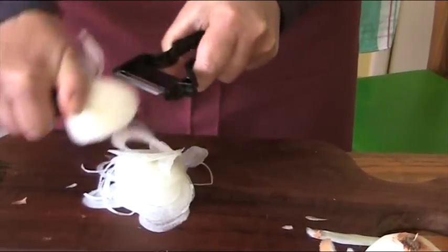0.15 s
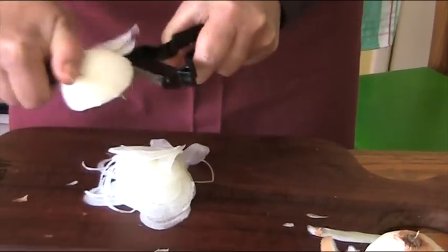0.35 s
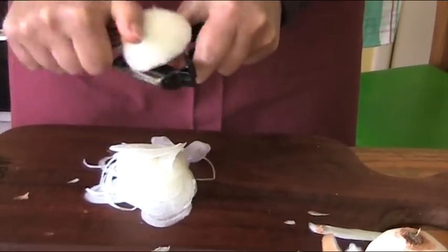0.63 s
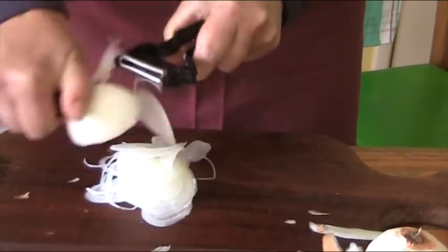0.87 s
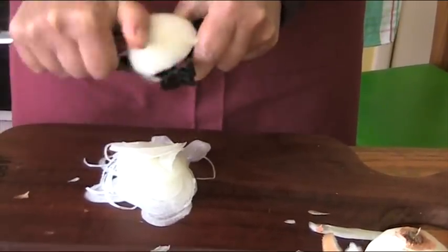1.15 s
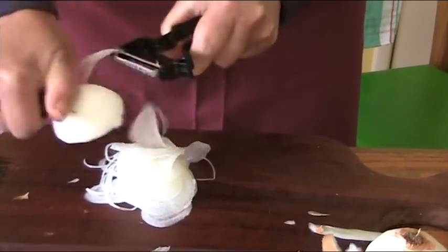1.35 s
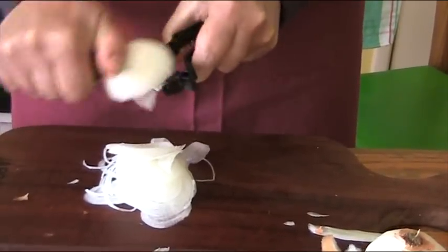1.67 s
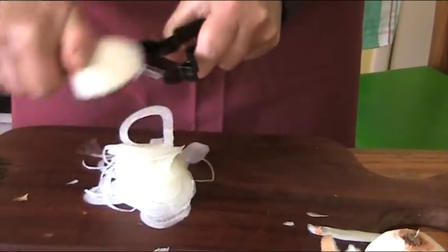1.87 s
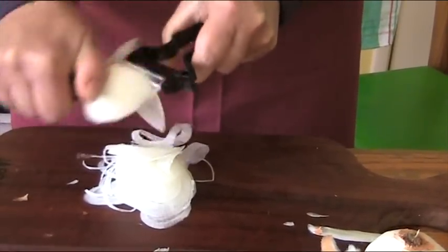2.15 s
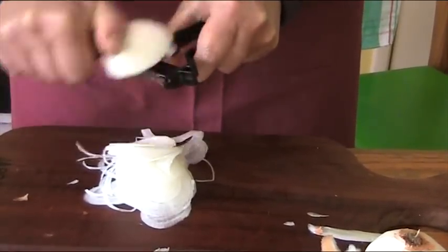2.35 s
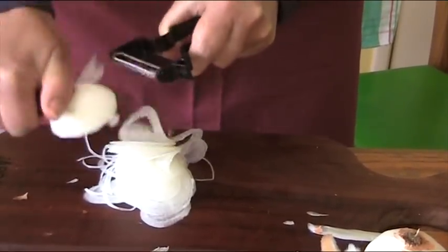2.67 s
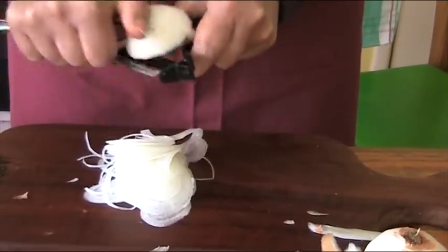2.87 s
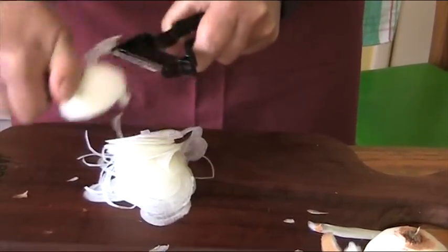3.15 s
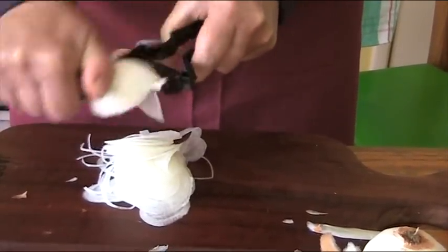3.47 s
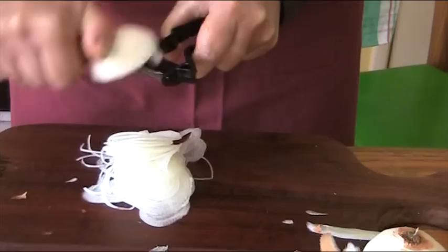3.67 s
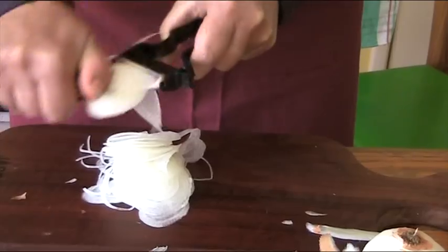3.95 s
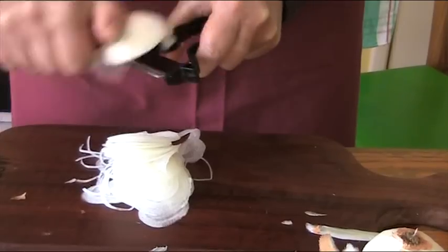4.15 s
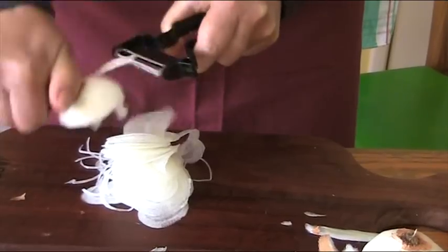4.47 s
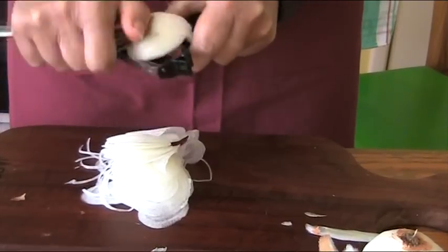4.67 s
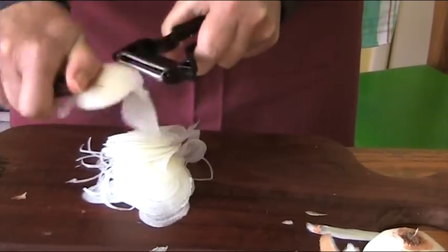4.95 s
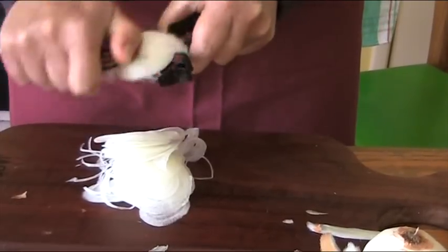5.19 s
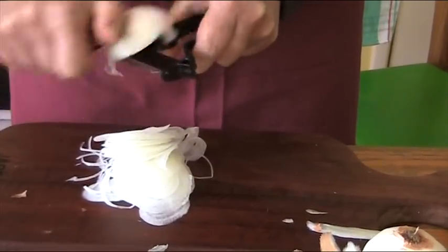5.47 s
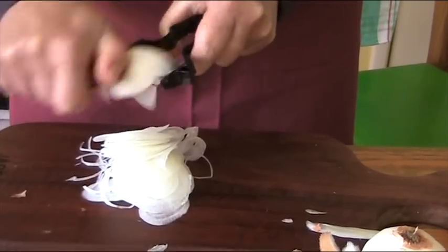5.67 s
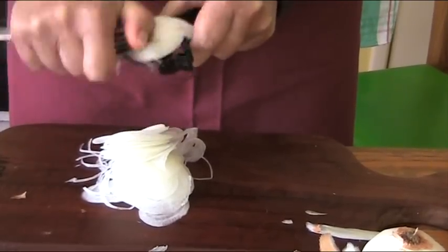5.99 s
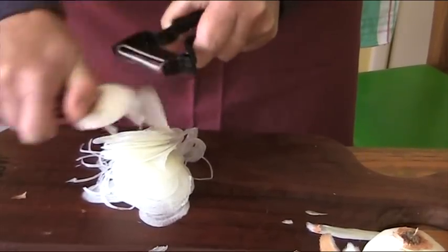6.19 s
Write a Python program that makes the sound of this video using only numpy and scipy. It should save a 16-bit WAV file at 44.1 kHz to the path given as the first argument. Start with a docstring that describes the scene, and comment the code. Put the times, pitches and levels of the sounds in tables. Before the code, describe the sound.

Half an onion is drawn over a hand-held steel peeler about twice a second, close to the microphone in a kitchen. Most strokes start with a light clack of the swivelling blade, run into a crisp, wet rasp and end in a small crunch and snap as the slice comes free. Now and then the loose blade gives a thin, high ring. The hard room echoes briefly over a low background noise.

```python
"""Half an onion is drawn again and again over a hand-held steel peeler, close by in a kitchen.
The swivelling blade clacks as the onion meets it, then bursts a dense stream of cells as it cuts.
At the end of the stroke the slice crunches, snaps free and slides off. Now and then the free blade
swings against its stop and sings. A dull rustle swells twice under the later strokes.
Throughout, the hard room rings on over a low background."""
import sys
import numpy as np
from scipy import signal
from scipy.fft import rfft, irfft, next_fast_len
from scipy.io import wavfile

SR = 44100
rng = np.random.default_rng(int(sys.argv[2]) if len(sys.argv) > 2 else 0)


def wav_out(sig):
    """Save sig, one row per channel (or a flat mono array), as 16-bit PCM at SR to the path in sys.argv[1]."""
    wavfile.write(sys.argv[1], SR, np.round(np.clip(np.atleast_2d(sig).T, -1, 1) * 32767).astype(np.int16))


N = 279153
TIME = np.arange(N) / SR
FFT_SIZE, BLOW_SIZE = 2 * next_fast_len(N // 2 + 1), 1024
FOLLOW_THROUGH_S = 0.015  # contact outlasts the snap

# Cuts. Each row: bite in seconds, snap in seconds, then relative levels in dB: final rasp, swell over
# the stroke, mid-stroke arch, fizz re rasp, final crunch re rasp, snap peak, snap treble.
STROKES = [(-0.08, 0.06, -34.5, -2, 1, -8, -6.5, -17, -15), (0.708, 0.875, -32.5, 6, 1.5, -8, -2, -14, -22),
           (1.17, 1.324, -34.5, 6, 3, -6, -6, -25, -26), (1.628, 1.758, -33.5, 5.5, 2, -5, -4, -16.5, -17),
           (2.039, 2.189, -33.5, 2.5, -0.5, -4, -3, -20.5, -9),
           (2.47, 2.625, -32, 5, 0, -6.5, -9, -10.5, -9), (2.932, 3.078, -33.5, 4.5, 0, -7, -11, -17, -12),
           (3.371, 3.524, -33.5, 6, 1, -6, -5.5, -16.5, -25),
           (3.833, 3.996, -35.5, 5, 3, -6, -3.5, -11, -6.5),
           (4.286, 4.41, -32.5, 5.5, 0, -8.5, -8, -21, -18),
           (4.703, 4.921, -40, 2.5, 5, -6.5, -12, -21, -8),
           (5.177, 5.304, -31.5, 9.5, 1.5, -8.5, -8, -14, -11),
           (5.6, 5.74, -34.5, 7, 4.5, -8.5, -6, -11.5, -13),
           (6.085, 6.195, -36.5, 2, 3.5, -7, -11, -14.5, -7)]


def undb(db):
    """Decibels to gain."""
    return 10 ** (np.asarray(db) / 20)


def unit(x):
    """Scale to rms 1."""
    return x / np.sqrt(np.mean(x ** 2))


def read(points, hz):
    """Interpolate a table on a log-frequency axis."""
    f, value = np.transpose(points)
    return np.interp(np.log(np.maximum(hz, 1)), np.log(f), value)


def bins(size):
    """Frequencies of a real spectrum in Hz."""
    return np.fft.rfftfreq(size, 1 / SR)


def colour(x, points):
    """Filter by a curve of (Hz, dB) points."""
    gain = undb(read(points, bins(FFT_SIZE)))
    return irfft(rfft(x, FFT_SIZE) * gain)[..., :x.shape[-1]]


def response(db):
    """Minimum-phase impulse response from a gain per bin."""
    cepstrum = irfft(np.log(undb(db)))
    half = len(cepstrum) // 2
    cepstrum[1:half] *= 2
    cepstrum[half + 1:] = 0
    return irfft(np.exp(rfft(cepstrum)))


def convolve(x, impulse):
    """Convolve, keeping the length of x."""
    return signal.fftconvolve(x, impulse)[:len(x)]


def unit_band(x, lo_hz, hi_hz):
    """Scale so that one band has rms 1."""
    f = bins(len(x))
    band = rfft(x)[(f > lo_hz) & (f < hi_hz)]
    return x * len(x) / np.sqrt(2 * np.sum(np.abs(band) ** 2))


def walk(rate_hz):
    """Random wander with a spread near 1."""
    knots = rng.standard_normal(4096)
    return np.interp(TIME * rate_hz, np.arange(len(knots)), knots)


def add(track, start_s, sound):
    """Mix a sound into a track."""
    i = max(int(start_s * SR), 0)
    track[i:i + len(sound)] += sound[:max(N - i, 0)]


def slicing():
    """The edge scrapes in and bursts cells; the bulb answers with a hollow crunch as the cut deepens."""
    # Spectra of the cut's four layers. Each row: frequency in Hz, relative level in dB.
    rasp_curve = [(150, -36), (450, -19.5), (700, -5.5), (1050, -8.5), (1600, -5.5), (2200, -2.5),
                  (3000, -1), (4500, -3), (5600, -0.5), (7000, -2.5), (8500, -3.5), (10000, -10),
                  (16000, -39)]
    crunch_curve = [(100, -18.5), (280, -13), (480, -8), (650, 1.5), (820, 0.5), (980, -5.5), (1300, -2),
                    (1800, -0.5), (3000, -15.5), (16000, -58)]
    fizz_curve = [(1000, -37), (7000, 1), (9000, -3.5), (10200, -6.5), (11500, -2.5), (13500, -3),
                  (14600, -2.5), (16000, -21)]
    scrape_curve = [(500, -24), (1400, -21), (1750, -3.5), (2200, -5), (2500, -10), (3200, -36),
                    (16000, -39)]
    bite_s, release_s = 0.0082, 0.014
    crunch_lead_s, crunch_width_s = 0.0021, 0.011
    rasp = peeler(ruptures(rasp_curve, per_s=12000, spread_db=1.5), ring_db=3.5)
    rasp = unit_band(rasp, lo_hz=1800, hi_hz=8000)
    crunch = peeler(ruptures(crunch_curve, per_s=1800, spread_db=2), ring_db=2)
    crunch = unit_band(crunch, lo_hz=350, hi_hz=1400)
    fizz = peeler(ruptures(fizz_curve, per_s=7000, spread_db=3.5), ring_db=-13)
    fizz = unit_band(fizz, lo_hz=9000, hi_hz=16000)
    scrape = unit(peeler(ruptures(scrape_curve, per_s=2800, spread_db=2.5), ring_db=7))
    out = np.zeros(N)
    for start_s, snap_s, rasp_db, swell_db, arch_db, fizz_db, crunch_db, *_ in STROKES:
        end_s = snap_s + FOLLOW_THROUGH_S
        span = (TIME > start_s) & (TIME < end_s)
        t = TIME[span]
        contact = np.clip((t - start_s) / bite_s, 0, 1) * np.clip((end_s - t) / release_s, 0, 1)
        progress = (t - start_s) / (end_s - start_s)
        effort_db = rasp_db - swell_db * (1 - progress) + arch_db * np.sin(np.pi * progress)
        giving_way = np.exp(-((t - snap_s + crunch_lead_s) / crunch_width_s) ** 2)
        hollow = undb(-20 + 5.5 * progress) + undb(crunch_db) * giving_way
        cut = rasp[span] + hollow * crunch[span]
        cut += undb(fizz_db + 3 * (1 - progress)) * fizz[span]  # juiciest on first contact
        cut += undb(-3 - 29 * progress) * scrape[span]  # the onion damps the frame's main note
        out[span] += contact * undb(effort_db) * cut
    out = wet_contact(out, depth_db=1.9, rate_hz=20)
    # The edge catches and slips on the bulb's layers.
    return out * undb(-3 + 0.5 * walk(rate_hz=480) + 0.093 * walk(rate_hz=37))


def ruptures(curve, per_s, spread_db):
    """Random clicks, as of bursting cells, most faint and a few loud, filtered by a curve."""
    bursts = rng.random(N) < per_s / SR
    strength = undb(spread_db * np.minimum(rng.exponential(size=N), 5))
    polarity = np.sign(rng.standard_normal(N))
    return colour(unit(bursts * strength * polarity), curve)


def wet_contact(x, depth_db, rate_hz):
    """Bands swell and sink independently as the wet contact patch changes shape."""
    centres_hz = np.geomspace(1000, 15000, 9)
    spectrum, f = rfft(x, FFT_SIZE), bins(FFT_SIZE)
    out = np.zeros(N)
    for share in np.eye(len(centres_hz)):
        band = irfft(spectrum * np.interp(f, centres_hz, share))[:N]
        out += band * undb(depth_db * walk(rate_hz))
    return out


def peeler(x, ring_db):
    """Blade and frame add their resonances to whatever shakes them."""
    # Each row: resonance in Hz, width in Hz, relative gain in dB.
    modes = [(1238, 170, -7), (2246, 100, -3), (2788, 130, -2), (3444, 160, -5.5), (3960, 210, -11),
             (5130, 120, -4), (5740, 120, -4.5), (6220, 68, -8), (6820, 50, 2.5), (7130, 60, -4),
             (8260, 40, -4), (11180, 350, 1.5), (13100, 230, -14)]
    ringing = sum(undb(db) * signal.lfilter(*signal.iirpeak(hz, hz / width_hz, SR), x)
                  for hz, width_hz, db in modes)
    return x + undb(ring_db) * ringing


def break_out():
    """The last bridge of onion gives way with a short, falling crunch."""
    # Crunch bands. Each row: centre in Hz, start before the snap in seconds, level in dB.
    bands = [(2480, 0.03, -39.5), (1710, 0.019, -46), (770, 0.011, -49.5), (427, 0.012, -52)]
    out = np.zeros(N)
    for hz, lead_s, db in bands:
        curve = [(hz / 2, -22), (hz, 0), (hz * 2, -22), (hz * 10, -60)]
        band = unit(ruptures(curve, per_s=2800, spread_db=3.5))
        gate = np.zeros(N)
        for _, snap_s, *_ in STROKES:
            add(gate, snap_s - lead_s, np.hanning(int(0.028 * SR)))
        out += undb(db) * band * gate
    return out


def slice_ends():
    """Each slice snaps free and two last fibres part; loose slices flick off and drop on the pile."""
    # Each row: start in seconds, relative peak in dB, relative treble in dB, chatter in seconds.
    flicks = [(0.081, -18, -8, .002), (0.400, -31, -19, .004), (0.423, -34, -15, 0.0037),
              (1.364, -29, -16, 0.0026), (1.486, -36, -16, 0.0044), (2.216, -21, -10, 0.0018),
              (3.100, -24, -6, 0.0018), (3.120, -23, -9, .002), (3.684, -39, -20, .003),
              (4.578, -30.5, -23, 0.0094), (4.630, -34, -21, .008), (4.655, -38, -16, 0.0074),
              (4.974, -27, 0, 0.0034), (5.088, -41, -15, 0.0027), (5.327, -20, -9, .003),
              (5.778, -24, -15, .002), (6.222, -21, -7, 0.0022)]
    fibre_db, fibre_fade_db_per_s = -24, 120
    snaps, out = list(flicks), np.zeros(N)
    for _, snap_s, *_, snap_db, treble_db in STROKES:
        snaps.append((snap_s, snap_db, treble_db, 0.0022))
        for late_s in rng.uniform(0.015, 0.043, 2):
            snaps.append((snap_s + late_s, fibre_db - fibre_fade_db_per_s * late_s, -13, 0.002))
    for start_s, peak_db, treble_db, chatter_s in snaps:
        snap = blow(peak_db, knock_db=-26, treble_db=treble_db,
                    chatter_s=chatter_s, rise_s=0.81 * chatter_s, fade_s=0.011)
        add(out, start_s, snap)
    return undb(-5.5) * peeler(out, ring_db=-2)


def slither():
    """After each cut the wet slice slides off the steel with a fading crackle."""
    # Crackle spectrum. Each row: frequency in Hz, relative level in dB.
    curve = [(300, -18), (1500, 8), (3000, 12), (7000, 3), (11500, -1), (16000, -26)]
    crackle = unit(peeler(ruptures(curve, per_s=1400, spread_db=0), ring_db=-3))
    t, slides = TIME[:SR // 4], np.zeros(N)
    fade = undb(-37.5) * np.exp(-t / 0.0046) + undb(-55) * np.exp(-t / 0.23)
    for _, snap_s, *_ in STROKES:
        add(slides, snap_s + FOLLOW_THROUGH_S, fade)
    return crackle * slides


def blade_clacks():
    """The loose blade chatters against its stop, pressed by the onion or swinging free."""
    # Free swings. Each row: start in seconds, relative peak, low knock and treble in dB,
    # note in Hz, chatter in seconds, rise in seconds.
    swings = [(0.187, -12.5, -22.5, -17, 5340, .002, 0.0012), (0.194, -9.5, -22, -6, 5800, 0.0045, 0.0049),
              (0.370, -18.5, -27, -14, 8340, 0.0039, 0.002), (1.051, -15, -27, -4, 3330, 0.0062, 0.0017),
              (2.362, -14.5, -37, -4.5, 2940, 0.0021, 0.0022),
              (5.881, -17.5, -20, -17.5, 4960, 0.005, 0.0019)]
    # The onion lands on the blade. Each row: start in seconds, relative peak and treble in dB,
    # note in Hz, rebound in dB re the first knock.
    landings = [(0.664, -31.5, -17, 2840, -16), (0.695, -30.5, -14, 2100, -15),
                (1.147, -26.5, -15, 5730, -20), (1.601, -29.5, -16, 5600, -15),
                (1.629, -23, -20, 5780, -10), (2.031, -14, -7, 2200, -7), (2.467, -20, -7, 2200, 1),
                (2.916, -14, -8, 2160, -1), (3.359, -22.5, -19, 2830, -12), (3.823, -26, -18, 2250, 5),
                (4.269, -24, -12, 2200, 2), (4.691, -26.5, -15, 2200, 2), (5.16, -20.5, -8, 2380, -9),
                (5.576, -33, -10, 5770, 0.5), (5.599, -27.5, -8, 5700, -12), (6.008, -28.5, -23, 2220, -8),
                (6.028, -28, -14.5, 2230, -5)]
    cushioned_db, landing_chatter_s, landing_rise_s, rebound_s = -29.5, 0.0043, 0.0027, 0.0081
    clacks, out = list(swings), np.zeros(N)
    for start_s, peak_db, treble_db, hz, rebound_db in landings:
        for at_s, db in (start_s, peak_db), (start_s + rebound_s, peak_db + rebound_db):
            clacks.append((at_s, db, cushioned_db, treble_db, hz, landing_chatter_s, landing_rise_s))
    for start_s, peak_db, knock_db, treble_db, hz, chatter_s, rise_s in clacks:
        # The strike point decides which damped note stands out.
        note_db = 7 / (1 + ((bins(BLOW_SIZE) - hz) / 350) ** 2)
        clack = blow(peak_db, knock_db, treble_db, chatter_s, rise_s, fade_s=0.0057, note_db=note_db)
        soft_onset = blow(peak_db - 18.5, knock_db, treble_db - 10, chatter_s, rise_s, fade_s=0.005)
        add(out, start_s, clack)
        add(out, start_s - 0.003, soft_onset)  # a faint, duller lead-in softens the attack
    return undb(-4.5) * peeler(out, ring_db=-1.5)


def blow(peak_db, knock_db, treble_db, chatter_s, rise_s, fade_s, note_db=0):
    """A cushioned contact and a few milliseconds of chatter, each blow with its own colour."""
    # Clack spectrum. Each row: frequency in Hz, relative level in dB.
    curve = [(100, -52), (450, -18), (750, 4.5), (1500, 0), (2800, -0.5), (4200, -2), (5500, 3), (7200, 3),
             (9500, 0.5), (13500, -2), (16000, -23.5)]
    t, f = TIME[:BLOW_SIZE], bins(BLOW_SIZE)
    swell = np.minimum((t + 1 / SR) / rise_s, 1) ** 1.67
    decay = np.exp(-np.maximum(t - chatter_s, 0) / fade_s - t / 0.0059)
    burst = rng.standard_normal(BLOW_SIZE) * swell * decay
    low_db = 0.92 * (knock_db + 18)
    high_db = 0.64 * (treble_db + 9)
    tint_db = read([(1100, low_db), (2200, 0), (7500, 0), (10500, high_db)], f)
    sound = convolve(burst, response(read(curve, f) + tint_db + note_db))
    return undb(peak_db) * sound / np.abs(sound).max()


def blade_song():
    """Left free after a blow, the steel sings thin, high notes, favouring the modes near one pitch."""
    # Each row: start in seconds, level in dB, favoured pitch in Hz.
    rings = [(0.374, -53, 8200), (0.882, -50, 8200), (1.053, -33.5, 8250), (2.361, -34, 6600),
             (2.924, -32.5, 7660), (3.999, -35, 7000)]
    # Bare steel. Each row: mode in Hz, relative level in dB, T60 in seconds.
    modes = [(5100, 6, 0.22), (6740, 3, 0.11), (7400, 2, 0.11), (7730, 0, .06), (8260, 1, 0.14)]
    spread_hz, rise_s = 300, 0.0013
    song, t = np.zeros(N), TIME[:SR // 2]
    attack = np.minimum(t / rise_s, 1)
    for start_s, blow_db, favoured_hz in rings:
        for hz, db, t60_s in modes:
            share = 1 / np.hypot(1, (hz - favoured_hz) / spread_hz)
            decay = undb(blow_db + db - 60 * t / t60_s)
            add(song, start_s, share * decay * attack * np.sin(2 * np.pi * hz * t))
    return song


def rustle():
    """A dull, grainy rubbing, as of a sleeve against an apron."""
    # Spectrum. Each row: frequency in Hz, relative level in dB.
    curve = [(100, -17), (190, -6), (280, -3.5), (430, -7), (600, -1), (800, 2.5), (1100, -3), (2000, -9.5),
             (8000, -50)]
    # Two swells. Each row: time in seconds, level in dB.
    swells = [(4.26, -75), (4.30, -46), (4.50, -52), (4.66, -61), (4.77, -66), (4.81, -43.5), (4.93, -48.5),
              (5.04, -57.5), (5.16, -64)]
    level_db = np.interp(TIME, *np.transpose(swells), left=-np.inf, right=-np.inf)
    return unit(ruptures(curve, per_s=1500, spread_db=1)) * undb(level_db)


def room_tail():
    """Impulse response of the kitchen's diffuse echoes; the treble dies first."""
    # Each row: frequency in Hz, T60 in seconds.
    decay_times = [(200, 0.78), (1000, 0.72), (2500, 0.56), (6000, 0.51), (9000, 0.26), (15000, 0.25)]
    # Each row: frequency in Hz, reverberant level in dB re direct.
    levels = [(200, -2.5), (1000, -5), (2500, -7), (6500, -8), (9000, -9), (15000, -14)]
    t, f = TIME[:SR], bins(SR)
    centres_hz = np.geomspace(150, 16000, 12)
    onset = np.clip((t - 0.002) / 0.0047, 0, 1)
    noise, tail = rfft(rng.standard_normal(SR)), np.zeros(SR)
    for hz, share in zip(centres_hz, np.eye(len(centres_hz))):
        fade = onset * undb(-60 * t / read(decay_times, hz))
        band = irfft(noise * np.interp(f, centres_hz, share))
        tail += band * fade / np.sqrt(np.sum(fade ** 2)) * undb(read(levels, hz))
    return tail


def kitchen(x):
    """Hands and board scatter the close sound differently into each microphone; the room follows."""
    # Stereo width of close sound and room. Each row: frequency in Hz, side in dB re mid.
    near_width = [(200, -6), (1000, -52), (4000, -5), (6000, -13), (8500, -9), (12000, 0), (16000, -26)]
    room_width = [(200, -14), (1000, -12), (2500, -10), (6000, -4), (16000, 2.5)]
    phases = np.angle(rfft(rng.standard_normal(512)))
    scatter = irfft(np.exp(1j * phases))
    scatter[0] = 0  # no direct path
    side = colour(convolve(x, scatter), near_width) + colour(convolve(x, room_tail()), room_width)
    mid = x + convolve(x, room_tail())
    return np.array([mid + side, mid - side])


def background():
    """Low, wide room noise that wavers slightly."""
    # Spectrum ahead of the tilt. Each row: frequency in Hz, relative level in dB.
    curve = [(15, -46), (25, -15), (80, 0), (249, -5), (394, -9), (463, -10.5), (575, -11.5), (695, -14.5),
             (962, -14.5), (1040, -19), (1160, -17), (5430, -25.5), (9320, -34.5), (16000, -42.5)]
    # Each row: frequency in Hz, side in dB re mid.
    width = [(30, 0.5), (200, 3.5), (600, 5), (2000, 4), (16000, 1)]
    tilt = [(100, -3.5), (500, 0), (2000, 0.5), (8000, 3.5)]
    mid, side = (unit(colour(rng.standard_normal(N), curve)) for _ in range(2))
    side = colour(side, width)
    noise = colour(np.array([mid + side, mid - side]), tilt)
    return noise * undb(-57 + walk(rate_hz=4.99))


def scene():
    """Cutting, snaps, sliding slices and blade clacks in the kitchen."""
    onion = slicing() + break_out() + slice_ends() + slither()
    cutting = kitchen(onion + blade_song() + rustle())
    clacks = kitchen(blade_clacks()) + kitchen(blade_clacks())  # two layers smooth the room's ring
    return cutting + clacks + background()


def record(dry):
    """Two slightly unlike microphones and a steep low-pass at 16 kHz."""
    # Each row: frequency in Hz, left minus right in dB.
    balance = [(100, 1), (300, 3), (600, 0.5), (2000, -0.8), (8000, -0.4), (12500, 1.5)]
    left = colour(dry[0], [(hz, db / 2) for hz, db in balance])
    right = colour(dry[1], [(hz, -db / 2) for hz, db in balance])
    return signal.sosfilt(signal.ellip(10, 0.1, 80, 16000, fs=SR, output="sos"), [left, right])


dry = scene()
out = record(dry)
wav_out(out)
```